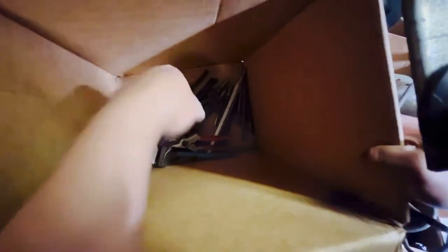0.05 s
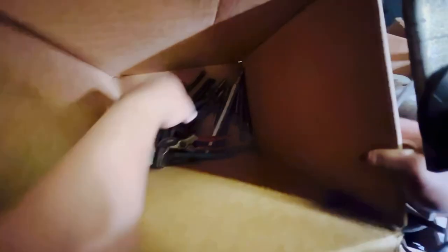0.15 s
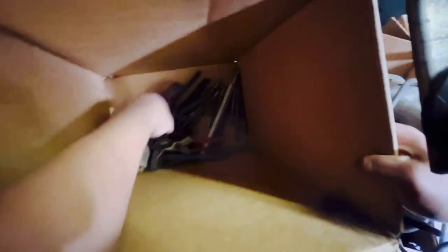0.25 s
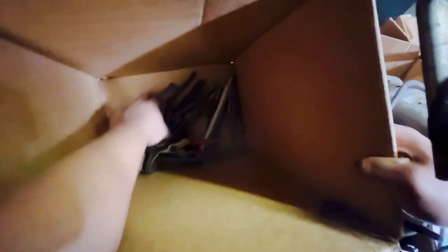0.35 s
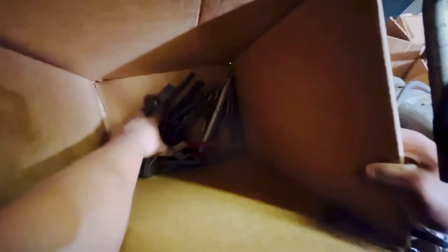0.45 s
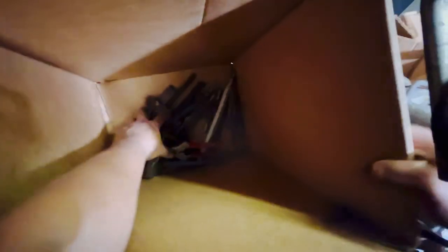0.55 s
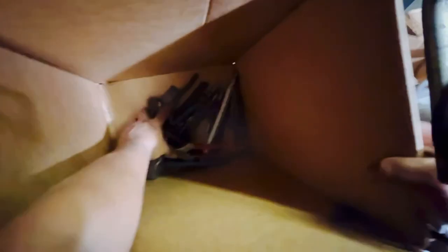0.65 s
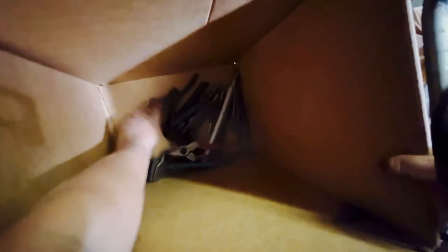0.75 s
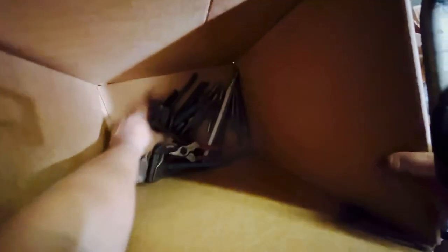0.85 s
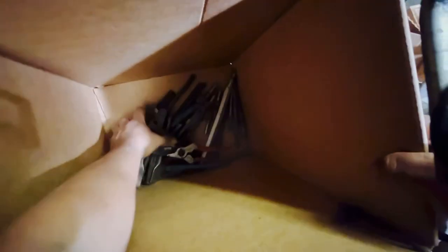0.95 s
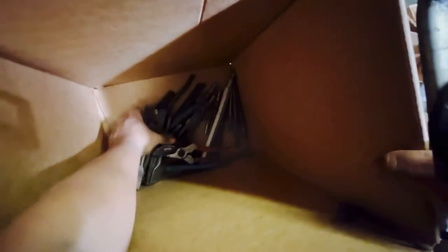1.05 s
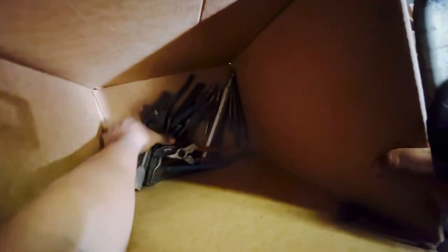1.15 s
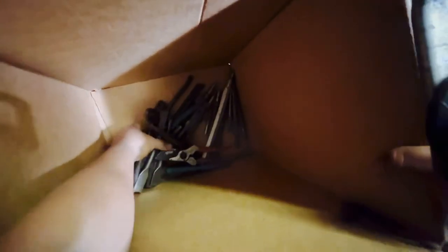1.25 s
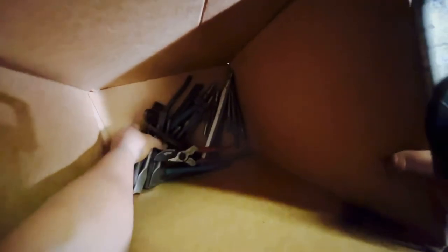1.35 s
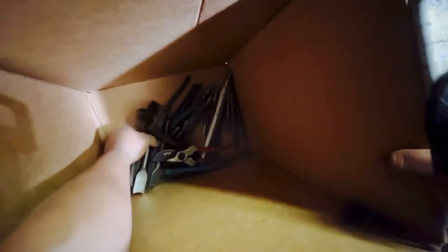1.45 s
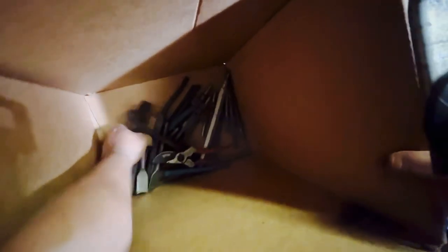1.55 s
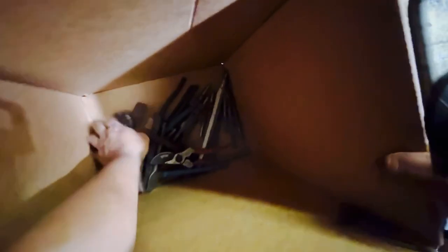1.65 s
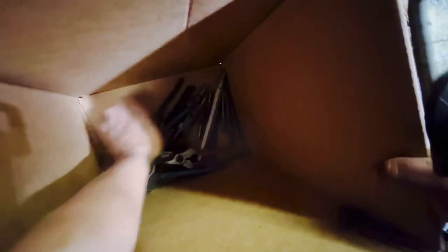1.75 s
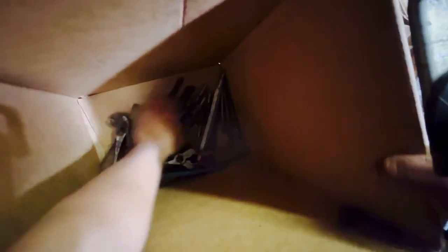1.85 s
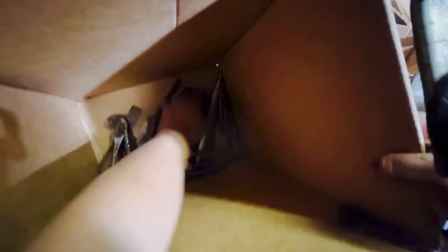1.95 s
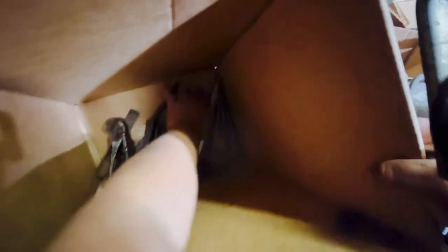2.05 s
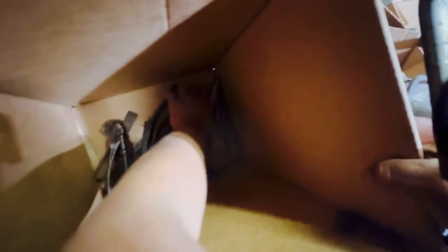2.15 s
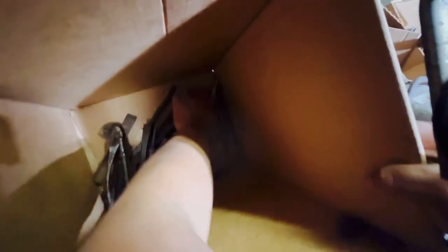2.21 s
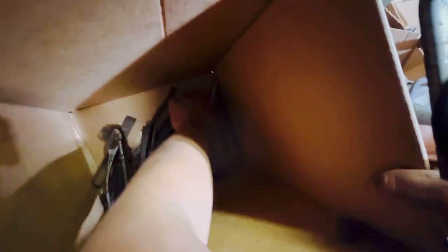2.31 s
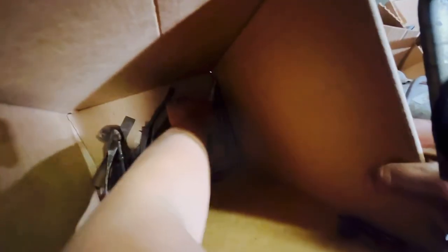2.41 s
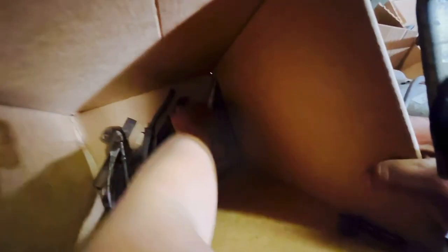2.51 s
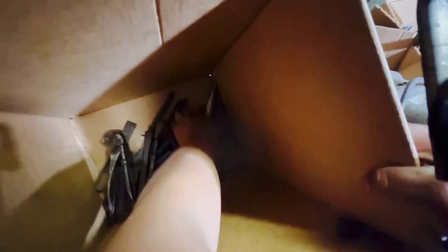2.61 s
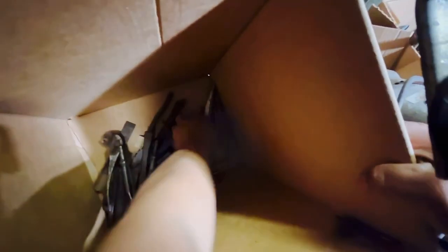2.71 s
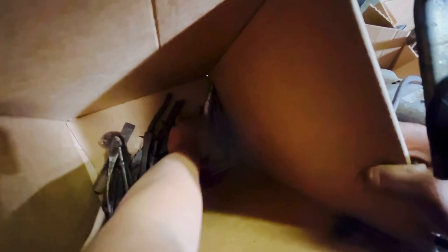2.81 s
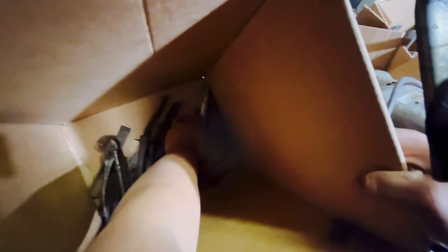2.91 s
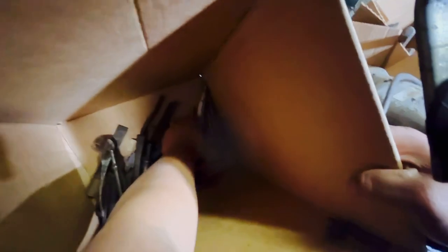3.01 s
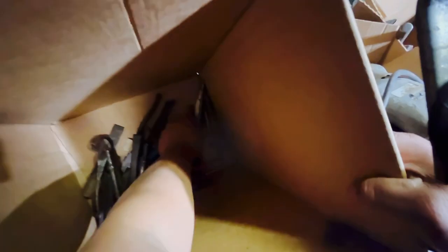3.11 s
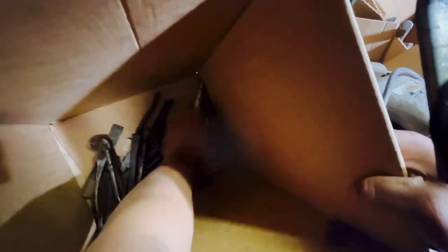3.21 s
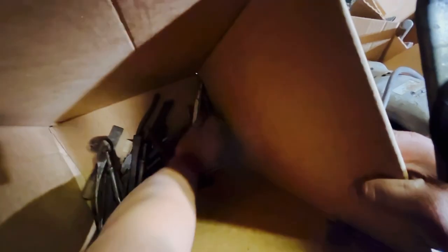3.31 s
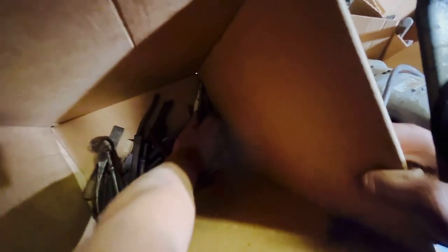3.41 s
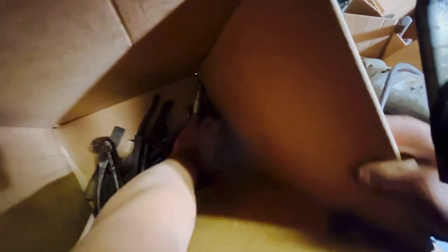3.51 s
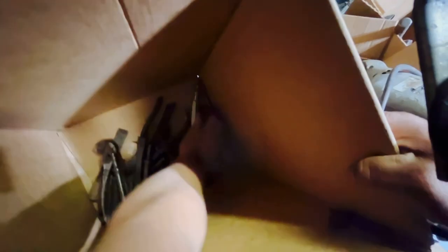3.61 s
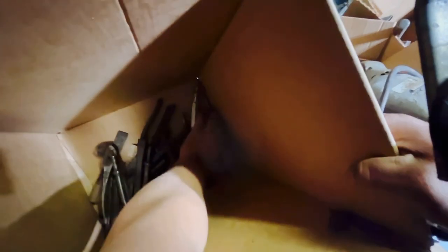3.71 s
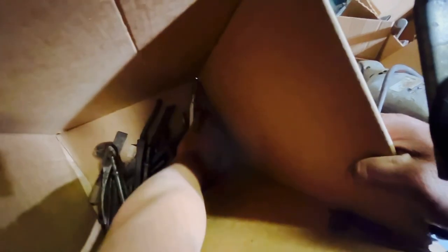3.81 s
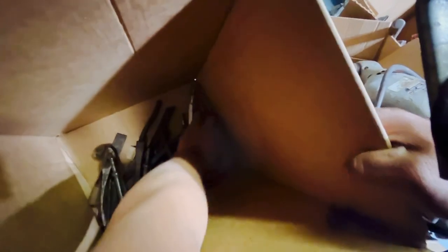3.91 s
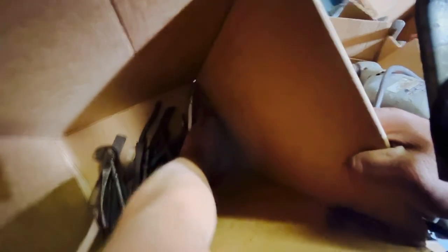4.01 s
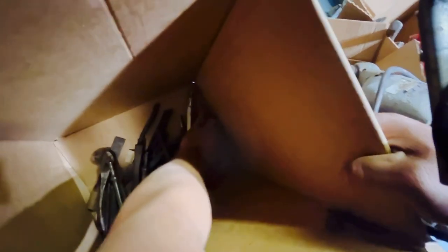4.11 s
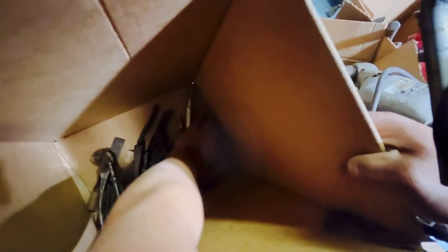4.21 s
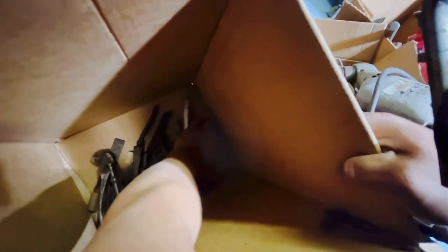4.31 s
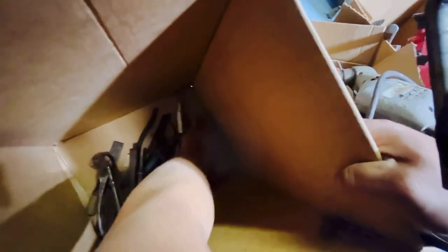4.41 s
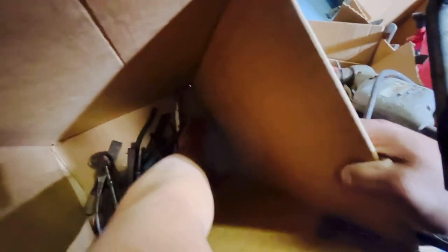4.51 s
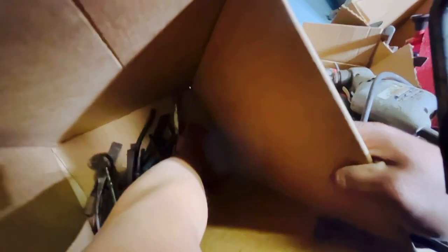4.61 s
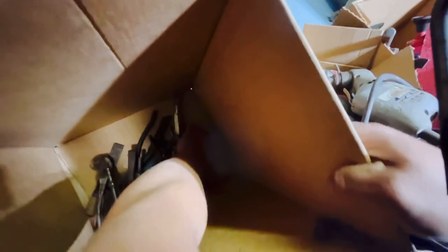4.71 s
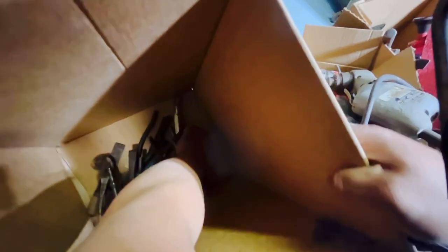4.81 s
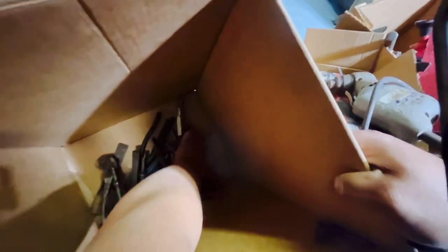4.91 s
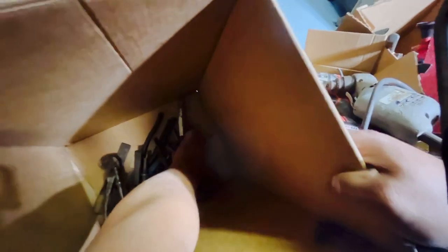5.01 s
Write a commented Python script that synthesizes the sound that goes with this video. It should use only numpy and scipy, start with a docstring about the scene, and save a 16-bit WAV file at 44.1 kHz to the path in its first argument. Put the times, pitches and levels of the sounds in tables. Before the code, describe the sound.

After a soft brushing hiss, loose steel tools are shoved about in a cardboard box, knocking, scraping and ringing briefly, close up.

```python
"""First a soft hiss, an arm brushing the wall of a big cardboard box; then a hand rummages in steel tools.
Each contact is a force driving resonances: the cardboard thuds, short steel modes clack and tick.
Tools that are free to vibrate ring in their bending modes, as sums of decaying sinusoids.
Each shove is stick-slip noise, a rumble and a scrape, with a tumble of small contacts around it.
Decaying noise gives the echo of box and small room, over still air; two close microphones pick it all up."""
import sys
import numpy as np
from scipy import signal
from scipy.fft import rfft, irfft
from scipy.io import wavfile
from scipy.ndimage import uniform_filter1d, minimum_filter1d

SR = 44100
rng = np.random.default_rng(int(sys.argv[2]) if len(sys.argv) > 2 else 0)


def store_wav(level_fs):
    """Save 16-bit WAV to argv[1]."""
    pcm = np.round(np.clip(np.atleast_2d(level_fs), -1, 1) * 32767)
    wavfile.write(sys.argv[1], SR, pcm.T.astype(np.int16))


N = 222969


# loud contacts, levels before the trims in knocks():
# (time [s], cardboard thud level [dB], thud centre [Hz], clack level [dB], steel tick level [dB])
CONTACTS = [(0.558, -26.5, 372, -29, -38.5), (0.5875, -28, 450, -28.5, -35), (0.6383, -32, 490, -28, -20),
            (0.684, -16, 535, -27.5, -41), (0.692, -23, 450, -21.5, -27), (0.7219, -24.5, 428, -29, -50),
            (0.7735, -30.5, 325, -29.5, -29), (0.816, -23.5, 511, -23.5, -58), (0.8296, -6, 478, -29, -40),
            (0.844, -13, 185.8, -27, -20), (0.8755, -12.5, 590, -16.5, -40.5), (0.8876, -9, 517, -21, -9.5),
            (0.941, -22.5, 413.7, -20.5, -26), (1.1135, -13, 450, -18, -5),
            (1.1253, -5.5, 501.5, -13.5, -18.5), (1.1453, -15.5, 231, -13.5, -3),
            (1.2113, -33.5, 335.6, -52, -31), (1.2317, -26.5, 497.7, -17, -9.5),
            (1.2573, -13, 432, -33, -46), (1.2965, -20, 553, -23, -10), (1.389, -17.5, 609.6, -25, -21.5),
            (1.4216, -20.5, 562, -28.5, -19.5), (1.5265, -27, 600, -20, -19.5),
            (1.5387, -22.5, 497, -22, -10.5), (1.5714, -8, 500, -15, -9.5), (1.595, -14.5, 477, -23, -10),
            (1.7154, -17, 326, -26, -37), (1.9161, -25.5, 466.4, -35, -43.5), (1.957, -22, 405, -37.5, -40),
            (2.0556, -25, 635, -26, -23), (2.1275, -13, 388, -28.5, -42), (2.2017, -19, 604, -30.5, -32),
            (2.2304, -23, 523, -26, -15.5), (2.2583, -22, 439.4, -26, -21),
            (2.3179, -32, 435.4, -19.5, -24.5), (2.345, -35, 603, -27, -17),
            (2.3595, -27, 347.7, -19.5, -12.5), (2.379, -21.5, 379.8, -23.5, -14),
            (2.4281, -36.5, 416, -30, -10.5), (2.4524, -17.5, 362.3, -37, -11.5),
            (2.5162, -19, 384.4, -41, -16), (2.5393, -14, 392.3, -19, -38),
            (2.559, -15, 406.4, -34.5, -5.5), (2.5705, -20, 397, -17, -19.5), (2.5938, -30, 390, -27, -18),
            (2.6663, -23, 450, -27, -15.5), (2.922, -28.5, 507, -23, -19.5), (2.944, -20.5, 519, -19, -11),
            (3.0061, -31.5, 274, -23, -17.5), (3.2166, -21, 433, -19, -14), (3.2622, -24.5, 131, -42, -33),
            (3.332, -30.5, 83.7, -40, -30), (3.453, -35.5, 522.5, -33, -24.5),
            (3.5159, -24, 426, -50, -48.5), (3.5294, -28, 604, -30, -21), (3.5765, -23, 344, -41, -32),
            (3.622, -27.5, 132.3, -43, -66), (3.6666, -11.5, 450, -21, -19),
            (3.7039, -21.5, 520, -19.5, -7.5), (3.734, -15.5, 344, -19, -8.5),
            (3.828, -19, 132.5, -30, -16.5), (3.973, -29, 514, -27.5, -19), (3.9882, -19.5, 461, -27, -42),
            (4.044, -34, 440, -37, -39), (4.0799, -31, 519, -27, -39), (4.156, -31.5, 534, -18, -24),
            (4.2343, -23.5, 631, -24, -9.5), (4.44, -43, 324.3, -31.5, -28), (4.4643, -26, 322.6, -33, -16),
            (4.5279, -28.5, 476, -33, -19.5), (4.6111, -26, 387, -29.5, -65.5),
            (4.7121, -17.5, 466, -22.5, -15), (4.803, -27, 415, -22.5, -12), (4.8505, -24, 250, -38, -40),
            (4.8782, -29.5, 293, -44, -15.5)]
# steel on steel (more tick than thud) clacks higher than steel on cardboard
CLACK_HZ, CLACK_OCTAVES_PER_DB = 1907, 0.021


def knocks(contacts):
    """Impact excitation: each contact shakes the cardboard floor and quickly damped modes of the tools."""
    out, t = np.zeros((2, N)), np.arange(4096) / SR
    for s, thud_db, thud_hz, clack_db, tick_db in contacts:
        # one firm push, then the heap settles
        push = 13 * (t == 0) + pair(1.0, size=len(t)) * np.exp(-t / 0.013)
        thud = band(push, thud_hz * 0.81, thud_hz * 1.17, order=1)
        thud = band(thud, 62, 1060)

        contact = chatter(t, decay=0.0036, bounce=0.46, gap=0.0072)
        contact *= 1 - np.exp(-t / 0.0006)  # soft onset
        force = contact * rng.standard_normal(len(t))
        grit = pair(0.028, size=len(t)) * contact

        clack_hz = CLACK_HZ * 2 ** (CLACK_OCTAVES_PER_DB * (tick_db - thud_db))
        clack_modes = clink(force, t, clack_hz, octaves=2.6, t60=0.015, count=20)
        clack_grit = band(grit, clack_hz * 0.5, clack_hz * 1.82, order=1)
        clack = band(blend(clack_modes, clack_grit, grit_db=2.5), 610, 3700, order=3)

        tick_modes = clink(force, t, 6500, octaves=0.95, t60=0.032, count=12)
        tick_grit = band(grit, 3360, 7440)
        tick = band(blend(tick_modes, tick_grit, grit_db=-4.5), 2600, 0.48 * SR)

        sound = at_level(thud, thud_db - 0.5) + at_level(clack, clack_db - 0.3)
        add(out, s, sound + at_level(tick, tick_db - 10))
    return out


def chatter(t, decay, bounce, gap):
    """Inelastic rebound: the force of one sharp touch, then three weaker ones at uneven gaps [s]."""
    power = np.exp(-t / decay) ** 2
    for k, delay in enumerate(np.cumsum(gap * rng.uniform(0.29, 1.3, 3))):
        rebound = bounce ** (k + 1) * (t >= delay) * np.exp(-abs(t - delay) / decay)
        power += rebound ** 2
    return np.sqrt(power)


def clink(force, t, centre_hz, octaves, t60, count=14):
    """Modal synthesis: short modes scattered about a pitch, driven by a force, mixed anew per microphone."""
    places = np.linspace(-1, 1, count) + rng.uniform(-0.89, 1, count) / count
    hz = np.clip(centre_hz * 2 ** (octaves * places), 100, 0.45 * SR)
    fading = np.log(1000) / (t60 * rng.uniform(0.18, 1.7, count))  # nepers per second
    size = np.hanning(count + 4)[2:-2] * amp(6.2 * rng.standard_normal((2, count)))
    phase = 2 * np.pi * rng.random(count) + rng.standard_normal((2, count))
    decaying = np.exp(np.outer(2j * np.pi * hz - fading, t))
    modes = ((size * np.exp(1j * phase)) @ decaying).real
    return signal.fftconvolve(modes, force[None], axes=1)[:, :len(t)]


def blend(modes, grit, grit_db):
    """Superposition: ringing modes over the grit of rough surfaces."""
    return at_level(modes, 0) + at_level(grit, grit_db)


# bending modes of each tool, by name: (frequency [Hz], relative level [dB])
TOOL_MODES = { "pliers": [(3176, -2.5), (3690, 4), (4632, -24), (5281, -6), (6100, 1), (6975, 1.5),
              (7994, -11.5), (10414, -8), (11488, -16)], "chisel": [(2896, 5), (3356, 10), (3916, -5),
              (4600, -9.5), (7560, 9), (9886, -10), (11154, -14), (13539, -13)], "punch": [(2900, -0.5),
              (3545, 5.5), (5300, -2.5), (5645, -1), (7055, -11), (7628, -14), (8200, 0), (9946, -20),
              (12783, -37), (14134, -14)], "handle": [(1500, -1), (2350, -32), (2780, 12), (3150, 18),
              (3520, 7)], "bit": [(2783, -3), (3908, -9), (4522, -15), (7162, 0), (7267, -5)],
              "file": [(2350, 4), (5392, 4), (8725, -2.5), (10935, -33), (13100, -32), (14020, -37.5)],
              "wrench": [(2810, 12), (2920, 8.5), (3243, 6.5), (3908, 2.5), (4845, 2), (7330, -1.5),
              (8810, -2.5), (9860, -19), (11600, -54), (14100, -19)], }
# blows that set a tool ringing, briefly if it is wedged in the heap; level is that of a 0 dB mode at 5 kHz:
# (time [s], tool, level [dB], tilt about 5 kHz [dB per octave], t60 at 5 kHz [s])
RINGING_BLOWS = [(0.857, "pliers", -32.5, -4, 0.38), (0.887, "pliers", -26.5, -6, 0.19),
                 (1.11, "pliers", -29.5, 7, 0.17), (1.143, "pliers", -24.5, 6, 0.11),
                 (1.234, "handle", -28, 6, 0.014), (1.309, "handle", -27.5, 6, 0.033),
                 (1.57, "pliers", -31, -7, .35), (1.605, "pliers", -32, 4.5, 0.27),
                 (2.38, "punch", -19.5, 17, 0.037), (2.38, "chisel", -26.5, 4.5, 0.9),
                 (2.471, "chisel", -25, 8.5, 0.3), (2.516, "chisel", -26, 2.5, 0.21),
                 (2.57, "handle", -35.5, 4, 0.19), (2.569, "punch", -30.5, -4, 0.43),
                 (2.641, "punch", -34, 6, 0.35), (2.665, "punch", -29, -5, 0.088),
                 (2.957, "handle", -32, 0.5, .035), (3.219, "punch", -15.5, 6, 0.032),
                 (3.233, "punch", -32, 6, 0.15), (3.454, "file", -38, -0.5, 0.052),
                 (3.515, "bit", -31.5, 5, 0.47), (3.665, "file", -29.5, 18, 0.15),
                 (3.704, "file", -27, 9, 0.15), (3.707, "bit", -38, 2.5, 0.29),
                 (3.705, "wrench", -40, 5.5, 0.33), (3.834, "file", -34.5, 5, 0.093),
                 (4.083, "file", -35.5, -3, 0.038), (4.156, "handle", -26.5, -3.5, 0.009),
                 (4.236, "file", -26.5, 4, 0.3), (4.44, "handle", -40.5, -2, 0.035),
                 (4.469, "wrench", -30.5, 9.5, 0.11), (4.53, "bit", -25, -10, 0.068),
                 (4.723, "file", -36.5, 5, 0.17), (4.745, "file", -35.5, -9, 0.18),
                 (4.802, "wrench", -18, 10, 0.086), (4.802, "file", -33, 2, 0.26),
                 (4.825, "wrench", -27.5, 0, 0.26), (4.94, "wrench", -31.5, 11.5, 0.13)]


def rings(uneven_db=4.0, damping=0.043, rattle=0.32):
    """Free vibration: a struck tool rings in its modes, wavering as it rattles, until its next blow."""
    out, t = np.zeros((2, N)), np.arange(SR * 2 // 5) / SR  # at most 0.4 s of each ring
    for s, tool, db, tilt_db, t60 in RINGING_BLOWS:
        hz, mode_db = np.transpose(TOOL_MODES[tool])
        scatter_db = uneven_db * rng.standard_normal((2, len(hz)))
        size = np.sqrt(2) * amp(db + mode_db + tilt_db * np.log2(hz / 5000) + scatter_db)
        # standing waves put the microphones out of step
        apart = np.pi / 2 * rng.uniform(-1.56, 1, len(hz))
        phase = 2 * np.pi * rng.random(len(hz)) + np.array([apart, -apart]) * 0.73
        fading = np.log(1000) / t60 * (hz / 5000) ** damping  # high modes die a little sooner
        modes = np.exp(np.outer(2j * np.pi * hz - fading, t))
        modes = modes * (1 + rattle * jostle(count=len(hz), size=len(t), rate_hz=57))

        later = [row[0] - s for row in RINGING_BLOWS if row[1] == tool and row[0] > s]
        next_blow = min(later + [1])
        alive = 1 - np.exp(-t / min(0.002, t60 / 40))
        alive *= np.exp(-np.maximum(t - next_blow, 0) / 0.0022)
        add(out, s, ((size * np.exp(1j * phase)) @ modes).real * alive)
    return out


def jostle(count, size, rate_hz):
    """Random modulation: low-passed complex noise wavers each mode; its depth differs from draw to draw."""
    white = rng.standard_normal((count, size)) + 1j * rng.standard_normal((count, size))
    slow = signal.sosfilt(signal.butter(2, rate_hz, fs=SR, output="sos"), white)
    return unit(slow)  # the mean complex square is small, so this waver exceeds rms 1


# the hand's shoves through the heap, rumble and scrape before the trims in sliding():
# (time [s], length [s], cardboard rumble level [dB], steel scrape level [dB])
HAND_SHOVES = [(0.303, .04, -39.5, -61), (0.499, .05, -42.5, -48.5), (0.638, 0.12, -31.5, -40),
               (0.856, .07, -20.5, -28.5), (1.123, .15, -21, -31.5), (1.462, 0.054, -35, -39),
               (1.594, 0.037, -25, -32), (1.741, 0.03, -28.5, -38.5), (1.985, 0.14, -38, -43.5),
               (2.234, .05, -39.5, -25.5), (2.403, .18, -28, -25), (2.979, 0.015, -30.5, -41.5),
               (3.087, .06, -51.5, -52), (3.2, .06, -33.5, -37), (3.529, 0.017, -33, -32.5),
               (3.726, .03, -26.5, -39.5), (3.998, 0.083, -32.5, -37.5), (4.201, 0.14, -34.5, -31.5),
               (4.452, 0.039, -33.5, -31.5), (4.631, 0.018, -35.5, -41.5), (4.817, 0.07, -28.5, -25.5),
               (4.96, .09, -38, -44.5)]
START_DB_PER_S, SETTLE_DB_PER_S = 207, 202  # how fast the heap gets moving, and comes to rest


def shoving():
    """Exponential growth and decay: rumble and scrape levels [dB] as each shove swells, holds and settles."""
    t = np.arange(0, N, 64) / SR
    levels = np.full((2, len(t)), -120.)
    for s, length, rumble_db, scrape_db in HAND_SHOVES:
        before = np.maximum(s - t, 0)
        after = np.maximum(t - s - length, 0)
        drop_db = START_DB_PER_S * before + SETTLE_DB_PER_S * after
        levels = np.maximum(levels, np.array([[rumble_db], [scrape_db]]) - drop_db)
    return np.array([np.interp(np.arange(N) / SR, t, level) for level in levels])


# levels of small contacts against the shove's rumble (thud) and scrape (clack, tick), and their scatter [dB]
TUMBLE_THUD_DB, TUMBLE_CLACK_DB, TUMBLE_TICK_DB, TUMBLE_SPREAD_DB = -4, -1.5, 3.5, 3


def tumbles(shove, count=40, thud_hz=400, spread_octaves=0.38):
    """Random point process: rows like CONTACTS, more of them and louder where the shove is stronger."""
    work = np.cumsum(amp(shove.mean(axis=0)))
    at = np.searchsorted(work, work[-1] * (np.arange(count) + rng.random(count)) / count)
    scatter = rng.standard_normal((4, count))
    rumble_db, scrape_db = shove[:, at]
    thud_db = rumble_db + TUMBLE_THUD_DB + TUMBLE_SPREAD_DB * scatter[1]
    clack_db = scrape_db + TUMBLE_CLACK_DB + TUMBLE_SPREAD_DB * scatter[2]
    tick_db = scrape_db + TUMBLE_TICK_DB + TUMBLE_SPREAD_DB * scatter[3]
    pitch_hz = thud_hz * 2 ** (spread_octaves * scatter[0])
    return np.transpose([at / SR, thud_db, pitch_hz, clack_db, tick_db])


# colour of the cardboard rumble: (frequency [Hz], relative density [dB per Hz])
RUMBLE_COLOUR = [(20, -28), (45, 5.5), (110, 3), (190, 5.5), (300, 4.5), (480, 3.5), (700, 4), (1000, -38),
                 (2000, -54)]
# colour of the steel scrape: (frequency [Hz], relative density [dB per Hz])
SCRAPE_COLOUR = [(500, -43), (900, 14.5), (1600, 5.5), (3000, 6), (4500, -11), (8000, -46), (10000, -38.5),
                 (12000, -57), (16000, -37)]


def sliding(shove):
    """Stick-slip friction: steel slips on steel and on cardboard, which rumbles under it."""
    rumble_slips = grains(per_s=220, spread_db=3.5, decay=0.014)
    rumble = coloured(pair(0.98, size=N) * rumble_slips, RUMBLE_COLOUR)
    scrape_slips = grains(per_s=350, spread_db=3.5, decay=0.0045)
    scrape = coloured(pair(0.017, size=N) * scrape_slips, SCRAPE_COLOUR)
    steel = amp(1) * scrape + amp(-11) * jingle()  # gains in dB
    return rumble * amp(shove[0] + 2.5) + steel * amp(shove[1])


def grains(per_s, spread_db, decay):
    """Shot noise: the envelope of many tiny slips of uneven size, each decaying in power."""
    sizes = amp(spread_db * np.minimum(rng.exponential(1, N), 3.5))
    slips = (rng.random(N) < per_s / SR) * sizes ** 2
    return np.sqrt(signal.lfilter([1], [1, -np.exp(-2 / (decay * SR))], slips))


def jingle(count=18):
    """Random impulses into resonators: small pieces touch, each with a few short modes of its own."""
    out, t = np.zeros((2, N)), np.arange(2048) / SR
    for _ in range(count):
        touches = (rng.random(N) < 36 / SR) * rng.random(N)  # 36 touches per second on average
        piece = unit(clink(np.ones(1), t, 3300, octaves=1.5, t60=0.09, count=7))
        out += signal.oaconvolve(touches[None], piece, axes=1)[:, :N]
    return unit(out)


# the arm brushing the box wall on its way in: (time [s], level [dB])
ARM_BRUSH = [(0, -45), (.05, -37), (.15, -38), (.27, -35), (.33, -39), (.42, -44.5)]
# colour of its hiss: (frequency [Hz], relative density [dB per Hz])
ARM_BRUSH_COLOUR = [(700, 3), (1500, 3.5), (2800, 3.5), (4500, -5.5), (8500, -10), (11000, -21.5),
                    (15000, -34)]


def brushing():
    """Broadband friction noise: skin on cardboard, a soft, even hiss."""
    return coloured(pair(0.043, size=N), ARM_BRUSH_COLOUR) * amp(curve(ARM_BRUSH))


# echo of box and room, level before its gradual onset:
# (frequency [Hz], level against the direct sound [dB], t60 [s])
BOX_AND_ROOM = [(60, -10.5, 0.97), (185, 0.5, 0.27), (450, -29.5, 0.74), (857, 12, 0.03),
                (1850, -5.5, 0.18), (4830, 3, 0.058), (12000, -16, 0.32)]


def echo(x, onset=0.018):
    """Diffuse reverberation: dense reflections from box walls and room; the bass lingers longest."""
    hz, t, z = signal.stft(rng.standard_normal((2, SR // 2)), SR, nperseg=256)
    alike = 1 / (1 + (hz / 500) ** 4)  # long waves reach both microphones alike
    z[1] = alike[:, None] * z[0] + np.sqrt(1 - alike ** 2)[:, None] * z[1]
    t60 = read(BOX_AND_ROOM, hz, axis=2)[:, None]
    level_db = read(BOX_AND_ROOM, hz)[:, None] - 60 * t / t60
    z *= amp(level_db) * np.sqrt(np.log(10 ** 6) / (t60 * SR))  # equal energy for any t60
    tail = signal.istft(z, SR, nperseg=256)[1]
    tail *= 1 - np.exp(-np.arange(tail.shape[1]) / (onset * SR))
    return signal.fftconvolve(x, tail, axes=1)[:, :N]


# colour of still room air: (frequency [Hz], relative density [dB per Hz])
AIR_COLOUR = [(20, -26), (55, 3), (120, 9), (250, -1.5), (450, -16), (900, -20), (3000, -31), (8000, -42),
              (11000, -47), (16000, -63)]


def still_air(level_db=-53):
    """Stationary noise: the steady, bass-heavy floor of still room air."""
    return amp(level_db) * coloured(pair(0.9, size=N), AIR_COLOUR)


def amp(db):
    """Decibel law: level to amplitude."""
    return 10 ** (np.asarray(db) / 20)


def unit(x):
    """Normalisation: scales a real signal to rms 1."""
    return x / np.sqrt(np.mean(x ** 2) + 1e-20)


def at_level(x, db):
    """Onset level: sets the rms of the first 14 ms of a blow."""
    return amp(db) * x / np.sqrt(np.mean(x[:, :SR * 14 // 1000] ** 2))


def read(points, hz, axis=1):
    """Interpolation: one column of a spectrum table on a log-frequency axis."""
    table = np.transpose(points)
    return np.interp(np.log(hz + 1), np.log(table[0] + 1), table[axis])


def curve(rows, axis=1):
    """Interpolation: one column of a time table, at every sample."""
    table = np.transpose(rows)
    return np.interp(np.arange(N) / SR, table[0], table[axis])


def add(mix, s, sound):
    """Superposition: mixes a stereo sound in at time s."""
    part = mix[:, max(round(s * SR), 0):][:, :sound.shape[1]]
    part += sound[:, :part.shape[1]]


def band(x, lo_hz, hi_hz, order=2):
    """Band limiting: a causal band-pass."""
    return signal.sosfilt(signal.butter(order, [lo_hz, hi_hz], "band", fs=SR, output="sos"), x)


def coloured(x, spectrum):
    """Spectral shaping: gives a long noise its spectrum, at rms 1."""
    gain = amp(read(spectrum, np.fft.rfftfreq(N, 1 / SR)))
    return unit(irfft(rfft(x) * gain, N))


def pair(likeness, size):
    """Partial coherence: white noise at two microphones, partly shared."""
    shared, *own = rng.standard_normal((3, size))
    return np.sqrt(likeness) * shared + np.sqrt(1 - likeness) * np.array(own)


LEAD = 20  # samples by which the near sound reaches the left microphone first


def scene():
    """Arrival-time difference: the heap lies to the left of the microphones; its ringing fills the box."""
    shove = shoving()
    hits = knocks(CONTACTS) + knocks(tumbles(shove))
    ringing = rings()
    rubbing = sliding(shove) + brushing()
    near = hits + echo(hits + amp(-8.5) * ringing) + rubbing
    near[1] = np.pad(near[1], (LEAD, 0))[:N]
    return near + ringing + still_air()


def limit(x, ceiling=0.92, size=220):
    """Gain reduction: turns both channels down for a few milliseconds around peaks that would overload."""
    room = np.minimum(1, ceiling / (abs(x).max(axis=0) + 1e-9))
    return x * uniform_filter1d(minimum_filter1d(room, size), size)


# difference in colour of the two microphones: (frequency [Hz], left minus right [dB])
LEFT_MINUS_RIGHT = [(60, 5), (200, 2), (450, 1.3), (1200, 7), (3300, 4.5), (5500, 2), (8500, -3),
                    (14000, -0.5)]
# microphone response in the top treble: (frequency [Hz], gain [dB])
TREBLE_RESPONSE = [(10000, -2.5), (14300, -16.5), (16000, -13)]
EDGE_HZ = 16300  # upper band limit


def record(dry):
    """Linear filtering: each microphone has its colour, both lose top treble; then limiter and band limit."""
    hz = np.fft.rfftfreq(N, 1 / SR)
    side_db = read(LEFT_MINUS_RIGHT, hz) / 2
    gains = amp([side_db, -side_db])
    gains = gains / np.sqrt(np.mean(gains ** 2, axis=0))  # mean power gain 1 at each frequency
    heard = irfft(rfft(dry) * amp(read(TREBLE_RESPONSE, hz)) * gains, N)
    low_pass = signal.firwin(511, EDGE_HZ, window=("kaiser", 9), fs=SR)
    return signal.oaconvolve(limit(heard), low_pass[None], "same")


dry = scene()
out = record(dry)
store_wav(out)
```